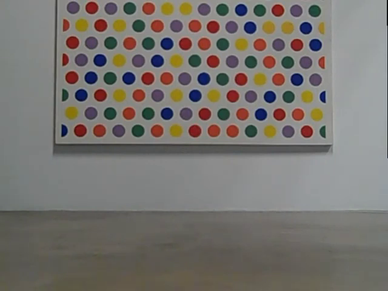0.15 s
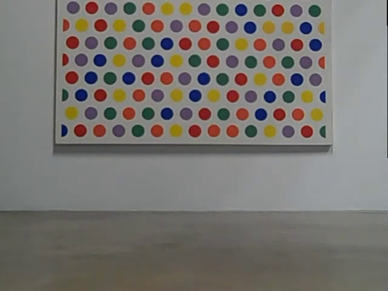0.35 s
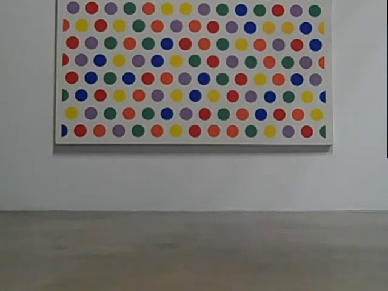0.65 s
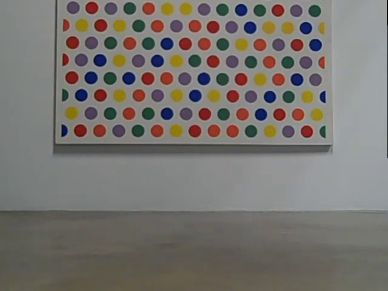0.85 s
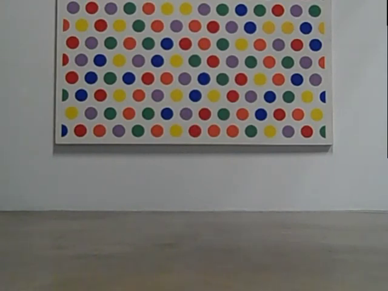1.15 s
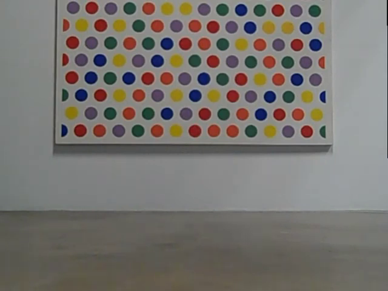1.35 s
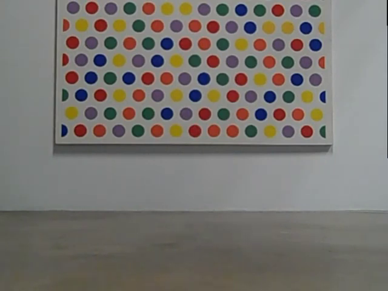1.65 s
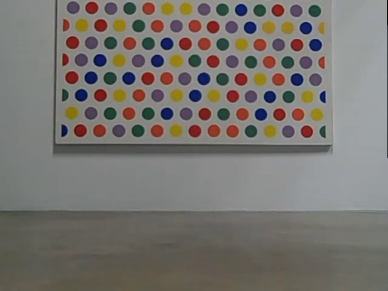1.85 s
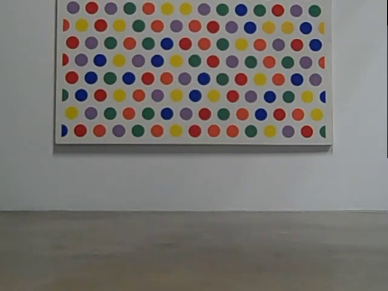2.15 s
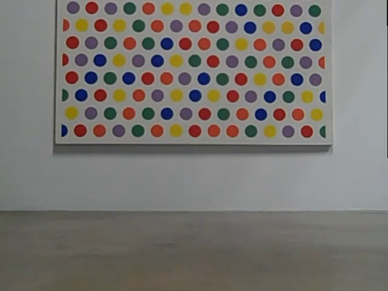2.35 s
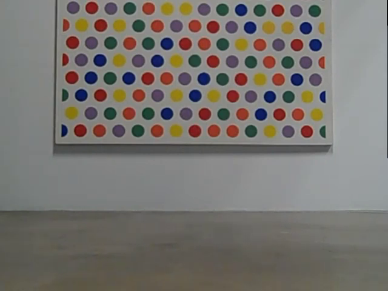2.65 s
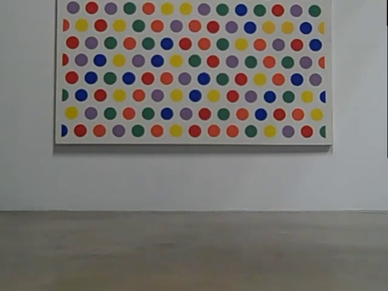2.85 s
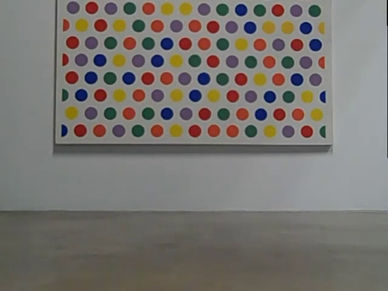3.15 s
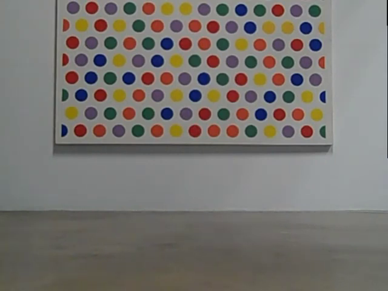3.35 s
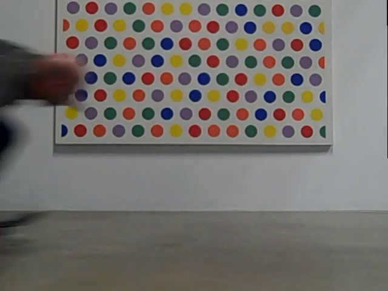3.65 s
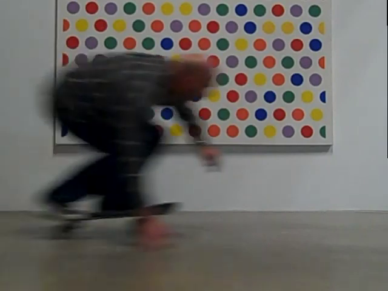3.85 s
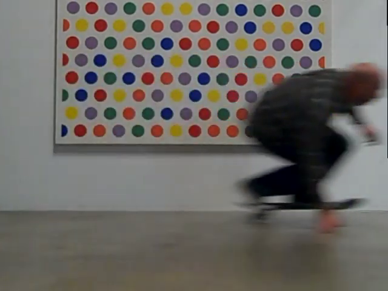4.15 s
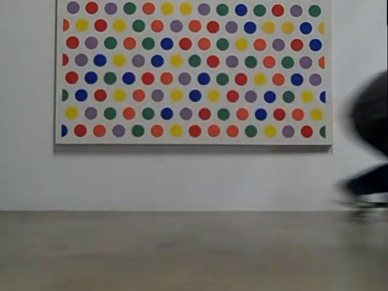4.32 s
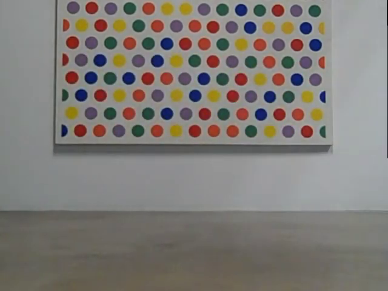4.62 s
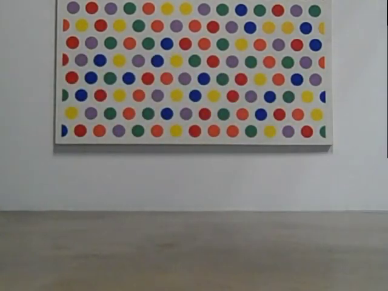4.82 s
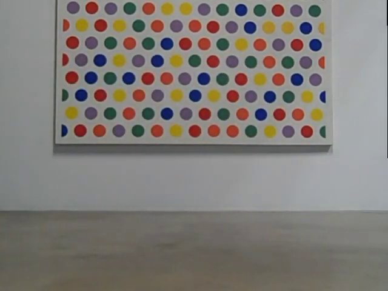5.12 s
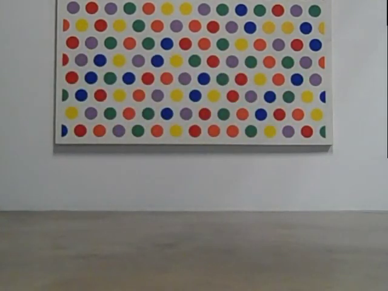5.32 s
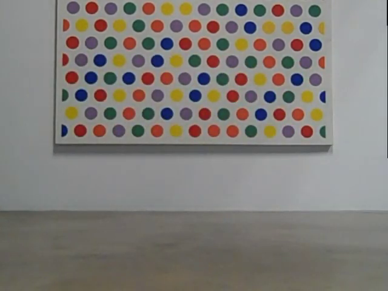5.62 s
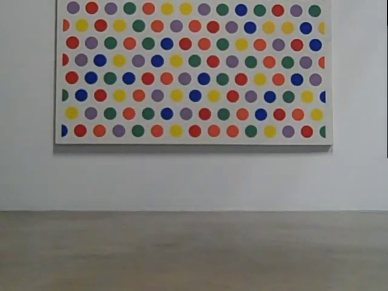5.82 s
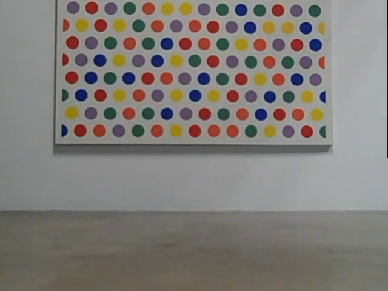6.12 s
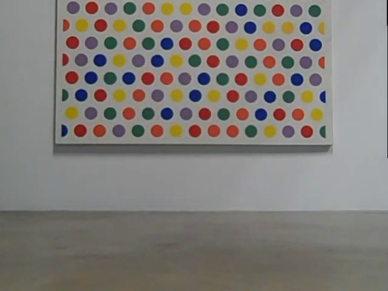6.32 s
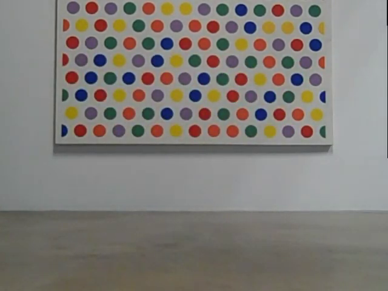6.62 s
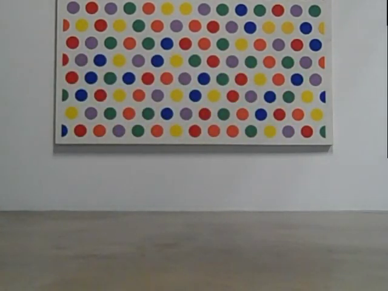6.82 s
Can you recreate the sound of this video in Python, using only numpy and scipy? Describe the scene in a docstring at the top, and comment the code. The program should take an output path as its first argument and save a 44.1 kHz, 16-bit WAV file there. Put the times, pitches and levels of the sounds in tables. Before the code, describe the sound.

In an echoing hall with a steady hush of ventilation, skateboard wheels drum across concrete and give a thin squeak. A cluster of sharp clacks and thuds follows, and the rolling grows louder. The wheels scuff, then skid close by, singing on one rough note through a slide. Two hard clacks end the slide, and the rolling fades.

```python
"""In a large, bare gallery with softly rushing ventilation, a skateboard crosses the concrete floor.
Its wheels rumble over tiny bumps and squeak; the wooden deck clatters under the rider's feet.
The wheels scrape in a skid, then stick and slip so that they sing through a glide.
The board clacks twice and rolls away, and the hall rings on after every blow."""
import sys
import numpy as np
from scipy import signal
from scipy.fft import rfft, irfft, next_fast_len
from scipy.io import wavfile

SR = 44100
rng = np.random.default_rng(int(sys.argv[2]) if len(sys.argv) > 2 else 0)


def dump(signal):
    """Clip the signal to [-1, 1] and save it as 16-bit WAV at the path in sys.argv[1]."""
    limited = np.clip(np.atleast_2d(signal).T, -1, 1)
    pcm = np.round(limited * 32767).astype(np.int16)
    wavfile.write(sys.argv[1], SR, pcm)


N = 307630
TIME = np.arange(N) / SR
FFT_SIZE = next_fast_len(N + 3 * SR)  # leaves room for the hall's echo
FREQS = np.maximum(np.arange(FFT_SIZE // 2 + 1) * SR / FFT_SIZE, 1)
GLIDE_START_S, GLIDE_END_S = 3.17, 4.66  # from the big skid to the last two clacks

# axles landing wheel by wheel, and at 2.047, 2.189 and 2.308 s the rider's footsteps and shoe scuffs: t/s,
# wood/dB, metal/dB, thud/dB, rattle/s, second blow's delay/s
CLACKS = [(1.752, -24, -42, -50, 0.048, 0.031), (2.047, -9, -24.5, -23, 0.019, .03),
          (2.189, -2.5, -22, -8.5, .035, .033), (2.308, -3, -19, -20.5, 0.031, .031),
          (3.065, -7.5, -21, -25, 0.0055, .017), (3.174, -9, -23, -27.5, 0.014, .026),
          (4.673, -13, -20, -21.5, .012, .021), (4.784, -8.5, -19.5, -20, 0.0075, .016)]
# the rider's weight comes down on the deck: t/s, thud/dB, deck ring/dB
STEPS = [(.503, -55, -30.5), (1.085, -27, -35), (2.032, -13.5, -17), (2.082, -21, -23), (2.141, -15.5, -19),
         (2.947, -35, -15), (3.135, -40, -13), (4.705, -31, -1.5), (4.81, -24, -7.5)]


def from_db(db):
    """Turn decibels into a gain."""
    return 10 ** (np.asarray(db) / 20)


def rms_one(x):
    """Scale a signal to an average power of 1."""
    return x / np.sqrt(np.mean(x ** 2) + 1e-20)


def at_hz(points, hz):
    """Read a table between its rows, with frequency spaced in octaves."""
    f, value = np.transpose(points)
    return np.interp(np.log(hz), np.log(f), value)


def since(s):
    """Seconds gone by since a moment; zero before it."""
    return np.maximum(TIME - s, 0)


def gate(start_s, end_s, attack_s, release_s):
    """A level that fades in at the start, holds, and fades out from the end on."""
    return np.clip(since(start_s) / attack_s, 0, 1) * np.clip(1 - since(end_s) / release_s, 0, 1)


def swell(peak_s, half_s, squareness=1.97):
    """A level that builds and eases in a bell shape."""
    return np.exp(-np.abs((TIME - peak_s) / half_s) ** squareness)


def drift(rate_hz):
    """A smooth random wobble of typical size 1, mostly slower than this rate."""
    hop, warm_up = 40, 2000
    r = np.exp(-2 * np.pi * hop * rate_hz / SR)
    noise = rng.standard_normal(N // hop + warm_up + 2)
    slow = signal.lfilter([1], [1, -2 * r, r * r], noise)[warm_up:]
    return np.interp(np.arange(N) / hop, np.arange(len(slow)), rms_one(slow))


def grains(per_s, spread_db, size=N):
    """Tiny contacts at random moments and of uneven strength."""
    strengths = from_db(spread_db * np.minimum(rng.exponential(1, size), 4)) * rng.choice([-1, 1], size)
    return rms_one(strengths * (rng.random(size) < per_s / SR))


def through(x, response):
    """Filter a signal with one gain for each frequency."""
    return irfft(rfft(x, FFT_SIZE) * response, FFT_SIZE)[..., :N]


def colour(x, tone):
    """Give a signal the spectrum in a table; only its shape counts, not its overall level."""
    size = 4096
    hz = np.maximum(np.arange(size // 2 + 1) * SR / size, 1)
    octaves_out = np.maximum(np.log2(tone[0][0] / hz), 0) + np.maximum(np.log2(hz / tone[-1][0]), 0)
    gain = from_db(at_hz(tone, hz) - 30 * octaves_out)
    # a minimum-phase filter: nothing sounds ahead of the hit
    cepstrum = irfft(np.log(gain + 1e-5))
    kernel = irfft(np.exp(rfft(2 * cepstrum[:size // 2], size)))
    return signal.oaconvolve(x, kernel / np.linalg.norm(kernel))[:N]


def ring(drive, hz, t60):
    """One ringing note that dies away by 60 dB in t60 seconds."""
    r, w = from_db(-60 / (t60 * SR)), 2 * np.pi * hz / SR
    gain = np.sin(w) * np.sqrt(2 * (1 - r * r))
    return signal.lfilter([0, gain], [1, -2 * r * np.cos(w), r * r], drive + 1e-18)


def diffuse(mid, side):
    """Sound from all around: left and right are alike in the bass and differ in the treble."""
    # stereo width: f/Hz, side compared with mid/dB
    width = [(30, -12), (70, -14), (250, -26.5), (600, -18), (1200, -11.5), (2000, -8.5), (3000, 0),
             (5000, -1), (8000, -3), (14000, -1.5)]
    return mid + through(side, from_db(at_hz(width, FREQS))) * np.array([[1], [-1]])


def nearby(x):
    """Direct sound reaches the two microphones slightly out of step."""
    # how far the left one is ahead: f/Hz, phase/rad
    lead = [(5500, 0.18), (7060, 1.5), (9400, -1.2), (14000, -0.66)]
    return through(x, np.exp(.5j * at_hz(lead, FREQS) * np.array([[1], [-1]])))


def texture(tone, per_s, spread_db):
    """A stereo wash of tiny contacts with this spectrum."""
    return diffuse(*[colour(grains(per_s, spread_db), tone) for _ in range(2)])


def air(level_db=-48):
    """Steady ventilation noise fills the hall."""
    # spectrum of the ventilation: f/Hz, level/dB
    tone = [(22, -16), (45, -1), (75, 4.5), (110, 4), (250, -3.5), (480, 4.5), (900, -4), (1600, -8.5),
            (2400, -16), (3100, -16.5), (4200, -23.5), (6400, -25), (8200, -33), (10500, -53), (14000, -60)]
    return from_db(level_db) * diffuse(*[colour(white, tone) for white in rng.standard_normal((2, N))])


def hall_response(build_s=0.0097):
    """The echo, as a filter: it builds up as the walls answer, and its treble dies first."""
    # how long the hall rings: f/Hz, time to fall 60 dB/s
    ring_times = [(60, 1.5), (150, 2.3), (500, 2.03), (1500, 2.4), (3300, 1.79), (4500, 1.16), (7000, 0.67),
                  (14000, 0.31)]
    t, edges = TIME[:3 * SR], np.geomspace(35, 16000, 19)
    white, tail = rng.standard_normal((2, 2, len(t))), np.zeros((2, N))
    for k, (low, high) in enumerate(zip(edges, edges[1:])):
        band = signal.sosfilt(signal.butter(2, [low, high], "band", fs=SR, output="sos"), white[k % 2])
        t60 = at_hz(ring_times, np.sqrt(low * high))
        tail[:, :len(t)] += band * np.exp(-np.log(1000) * t / t60)
    tail *= 1 - np.exp(-(TIME / build_s) ** 2)
    return rfft(diffuse(*tail) * np.sqrt(6 / SR), FFT_SIZE)


def bearings(run_db, gliding, level_db=-55.0, follows=1.17, dip_db=13, return_s=3.82, recovery_s=0.38):
    """The bearings hiss with the speed; the hiss dips after the skid and recovers."""
    # spectrum of the hiss: f/Hz, level/dB
    tone = [(1530, -29), (2600, -9), (2810, -11), (3070, -3), (3860, -6.5), (4430, -3), (4830, -7.5),
            (6070, -1), (7220, -5.5), (8100, -6), (10000, -21.5), (11600, -27), (13700, -32.5),
            (14500, -20)]
    dip = gliding * np.exp(-since(return_s) / recovery_s)
    return from_db(level_db + follows * run_db - dip_db * dip) * texture(tone, per_s=22000, spread_db=4.5)


def rumble(run_db, gliding, level_db=-43.0, follows=0.8, glide_loss_db=19, leaving_db_per_s=3.0):
    """The floor rumbles under the wheels, hardly at all in the glide, and less as the board leaves."""
    # spectrum of the rumble: f/Hz, level/dB
    tone = [(45, -34), (70, -13), (97, 0), (144, -1), (200, -0.5), (260, -3), (310, 2)]
    db = level_db + follows * run_db - glide_loss_db * gliding - leaving_db_per_s * since(GLIDE_END_S)
    return from_db(db) * texture(tone, per_s=1500, spread_db=6.0)


def growl(run_db, gliding, light_db=-35.5, heavy_db=-35.0, follows=0.9, glide_loss_db=6.5, loaded_s=1.84):
    """The deck growls, higher once the rider's weight is on it."""
    # spectra of the deck under a light and a heavy load: f/Hz, level/dB
    light_tone = [(140, -24), (240, -19), (371, -5.5), (431, -8.5), (522, -0.5), (574, -7), (620, -7.5),
                  (647, -7.5), (707, -6), (1000, -17), (1300, -53), (2200, -120)]
    heavy_tone = [(150, -44), (260, -18.5), (335, -7.5), (432, -4.5), (490, 1), (570, -1.5), (667, -0.5),
                  (734, -3), (799, -4.5), (957, -11), (1100, -15.5), (1430, -47), (2420, -120)]
    loaded = np.clip(TIME - loaded_s, 0, 1)
    light, heavy = (texture(tone, per_s=4000, spread_db=2.0) for tone in (light_tone, heavy_tone))
    deck = from_db(light_db) * np.sqrt(1 - loaded) * light + from_db(heavy_db) * np.sqrt(loaded) * heavy
    return from_db(follows * run_db - glide_loss_db * gliding) * deck


def rolling(roar_db=-42.5, throb_db=-0.5, turns_per_s=20.5, uneven_db=0.46):
    """Wheels drum over the fine roughness of the floor and throb once a turn."""
    # how hard the wheels run (push-off, burst of speed, roll away): t/s, level over an easy roll/dB
    effort = [(0.0, -12), (0.52, -12.5), (0.68, 1), (1.3, 0.5), (1.73, -2), (2.05, 9), (2.8, 7.5),
              (3.1, 10.5), (3.9, 9), (4.62, 4.5), (4.85, 4), (5.5, -1), (6.05, -1.5), (6.3, -4),
              (6.98, -3.5)]
    # spectrum of the wheels' roar: f/Hz, level/dB
    roar_tone = [(500, -33.5), (850, -6.5), (991, -2), (1080, -1), (1250, -1), (1490, -3), (1630, -1.5),
                 (2070, -12), (2290, -14.5), (2380, -18.5), (2600, -17), (3800, -33), (4200, -29.5),
                 (5460, -38), (9240, -120)]
    run_db = np.interp(TIME, *np.transpose(effort))
    gliding = gate(GLIDE_START_S, GLIDE_END_S, attack_s=0.17, release_s=0.018)
    wheel_angle = 2 * np.pi * np.cumsum(turns_per_s * (1 + 0.0606 * drift(1.32))) / SR
    throb = from_db(throb_db * np.sin(wheel_angle) + uneven_db * drift(7.4))
    roar = from_db(roar_db + run_db) * texture(roar_tone, per_s=8000, spread_db=1.0)
    return throb * (rumble(run_db, gliding) + growl(run_db, gliding) + roar) + bearings(run_db, gliding)


def drone(hz=168, t60=0.07, start_s=1.06, end_s=1.7, level_db=-39, fade_db_per_s=16.5):
    """The board hums a low note, shaken by the floor once a foot is on it."""
    bumps = grains(per_s=1500, spread_db=-1.0)
    hum = rms_one(ring(ring(bumps, hz, t60), hz, t60))
    level = from_db(level_db - fade_db_per_s * since(start_s))
    return hum * level * gate(start_s, end_s, attack_s=0.03, release_s=0.29)


def squeaks(jitter=0.0119, scoop=0.025, scoop_s=0.051, octave_db=-14, rough_db=4.0):
    """Thin rubbery squeals slide up to their pitch, swell and stop."""
    # each squeal: t/s, length/s, f/Hz, level/dB
    squeals = [(0.71, 0.245, 3272, -39.5), (1.988, 0.29, 3240, -41)]
    out, waver = np.zeros(N), 1 + jitter * drift(102)
    for s, length_s, hz, level_db in squeals:
        pitch = hz * waver * (1 - scoop * np.exp(-since(s) / scoop_s))
        phase = 2 * np.pi * np.cumsum(pitch) / SR
        arch = np.sin(np.pi * np.minimum(since(s) / length_s, 1))
        out += from_db(level_db) * arch * (np.sin(phase) + from_db(octave_db) * np.sin(2 * phase))
    return out * from_db(rough_db * drift(110))


def howl(hz=523, flat_hz=33, settle_s=0.0392, peak_s=3.27, half_s=0.058, peak_db=-16.5,
         held_db=-27.5, fade_db_per_s=8.5, jitter=0.0055, rough_db=4.5):
    """The rubbery wheels stick and slip: a note rises, flares up, then sings on through the glide."""
    # the tones in the howl: multiple of the pitch, level/dB
    partials = [(1, 2.5), (1.99, 1), (2.96, -2.5), (3.905, -16), (4.94, -16), (5.96, -21.5)]
    age = since(GLIDE_START_S)
    pitch = (hz - flat_hz * np.exp(-age / settle_s)) * (1 + jitter * drift(44.6))
    phase = 2 * np.pi * np.cumsum(pitch) / SR
    tone = sum(from_db(db + rough_db * drift(27)) * np.sin(k * phase) for k, db in partials)
    level = from_db(peak_db) * swell(peak_s, half_s) + from_db(held_db - fade_db_per_s * age)
    return rms_one(tone) * level * gate(GLIDE_START_S, GLIDE_END_S, attack_s=0.015, release_s=0.02)


def skid(judder_db=1.5, rasp_lag_s=0.016, rasp_stretch=1.23, bite_s=0.0067, bite_lead=0.98):
    """Wheels turned sideways bite, then judder over the concrete; a low rasp trails the bright grit."""
    # each scuff of the wheels: peak t/s, half length/s, rasp/dB, grit/dB
    scuffs = [(1.943, 0.052, -34, -43.5), (2.626, 0.048, -32.5, -35.5), (2.976, 0.042, -37, -42),
              (3.132, 0.039, -29.5, -36.5), (3.249, 0.086, -15.5, -17.5), (3.546, 0.044, -32.5, -39),
              (3.609, .03, -34, -37.5)]
    # spectra of the rasp and the grit: f/Hz, level/dB
    rasp_tone = [(180, -58), (300, -27.5), (417, -1.5), (467, 1.5), (517, -5.5), (610, -30), (655, -50),
                 (910, -19.5), (1040, -1), (1390, -6.5), (1570, 1.5), (1930, -7.5), (3500, -19),
                 (4550, -18), (7700, -120)]
    grit_tone = [(1410, -31), (2400, -6.5), (2790, -27), (4220, -13.5), (4940, -12.5), (5880, -1.5),
                 (7200, -4), (8120, -3), (9950, -16.5), (13700, -22), (14500, -58)]
    rasp_level, grit_level = np.zeros((2, N))
    for s, half_s, rasp_db, grit_db in scuffs:
        bite = np.clip(since(s - bite_lead * half_s) / bite_s, 0, 1)
        rasp_level += from_db(rasp_db) * bite * swell(s + rasp_lag_s, half_s * rasp_stretch)
        grit_level += from_db(grit_db) * bite * swell(s, half_s)
    rasp = from_db(-0.34) * rasp_level * texture(rasp_tone, per_s=2200, spread_db=0.0)
    close = nearby(colour(grains(per_s=14000, spread_db=2.0), grit_tone))
    scattered = texture(grit_tone, per_s=25000, spread_db=3.5)
    grit = grit_level * (from_db(-1.0) * close + from_db(-5.5) * scattered)
    return (rasp + grit) * from_db(judder_db * drift(33))


def thuds(boost_db=21):
    """Each clack and step gives a single soft push to board and floor."""
    # spectrum of a thud: f/Hz, level/dB
    tone = [(45, -27), (70, -10.5), (108, 4.5), (140, -1.5), (200, -0.5), (260, -5.5), (350, -37)]
    pushes = np.zeros(N)
    for s, db in [(s, db) for s, _, _, db, _, _ in CLACKS] + [(s, db) for s, db, _ in STEPS]:
        pushes[int(s * SR)] = from_db(db + boost_db)
    return colour(pushes, tone)


def blow(s, db, rattle_s, contact, rise_share=0.22):
    """The force of one sharp contact, followed by a rattle that swells and dies."""
    age, force = TIME[:SR // 4], np.zeros(N)
    shake = (1 - np.exp(-age / (rise_share * rattle_s))) * np.exp(-age / rattle_s)
    burst = grains(per_s=6000, spread_db=2.0, size=len(age)) * shake
    burst[0] += contact * shake.max()
    force[int(s * SR):int(s * SR) + len(age)] = from_db(db) * burst
    return force


def knocks(second_wheel_db=-3.5, wood_db=-7.0, clack_ring_db=-20.5, step_ring_db=-7.5, crack_db=-1.0):
    """Clacks knock the wood and the metal axle mounts; both clacks and steps set the deck ringing."""
    # spectra of the wood's knock and the metal's crack: f/Hz, level/dB
    wood_tone = [(250, -1), (310, -5.5), (420, 4.5), (600, -5), (740, 0.5), (950, -2.5), (1270, -4),
                 (1650, -8.5), (1950, -12.5), (2400, -17.5), (3000, -20)]
    crack_tone = [(1290, -5.5), (2200, -12), (3290, -14.5), (3670, -13.5), (5240, -14.5), (6090, -7.5),
                  (7900, -12.5), (10100, -30.5), (13700, -39), (14500, -32)]
    # notes of the plywood deck as it bends: f/Hz, level/dB, time to fall 60 dB/s
    deck_notes = [(411.7, -7, 0.083), (511, -3, 0.029), (597, -6.5, 0.055), (653, -3.5, 0.022),
                  (753, -1, 0.054), (783.5, -1.5, 0.074), (1010, -26, 0.19), (1250, -14.5, 0.065)]
    on_wood, on_metal = np.zeros((2, N))
    for s, body_db, metal_db, _, rattle_s, after_s in CLACKS:
        for at_s, wheel_db in ((s, 0), (s + after_s, second_wheel_db)):
            on_wood += blow(at_s, body_db + wheel_db, rattle_s, contact=6.3)
            on_metal += blow(at_s, metal_db + wheel_db, rattle_s, contact=1.6)
    stepping = sum(blow(s, db, rattle_s=0.0069, contact=7.6) for s, _, db in STEPS)
    on_deck = from_db(clack_ring_db) * on_wood + from_db(step_ring_db) * stepping
    wood = from_db(wood_db) * colour(on_wood, wood_tone)
    deck = sum((-1) ** k * from_db(db) * ring(on_deck, hz, t60)
               for k, (hz, db, t60) in enumerate(deck_notes))
    return wood + deck, from_db(crack_db) * colour(on_metal, crack_tone)


def scene():
    """The ventilation, the board, and the hall's echo of its blows, skids and squeals."""
    body, crack = knocks()
    thud, slide, wail, squeal = thuds(), skid(), howl(), squeaks()
    direct = nearby(thud + body + crack + wail + from_db(-0.5) * squeal)
    blows = from_db(-2.5) * thud + from_db(1.9) * body + from_db(-4.0) * crack
    friction = from_db(-7.0) * slide[0] + from_db(-4.5) * wail + from_db(3.0) * squeal
    return air() + rolling() + drone() + slide + direct + through(blows + friction, hall_response())


def record(dry, ceiling=0.88, cutoff_hz=14400):
    """The right microphone is duller than the left; peaks are rounded and the highest treble is cut."""
    # balance of the microphones: f/Hz, left minus right/dB
    tilt = [(100, 0.6), (800, 0.1), (1600, 1.5), (2800, 3.5), (4500, 2.5), (6500, -4.5), (8000, 12),
            (10000, 8), (14000, 17)]
    ratio = from_db(at_hz(tilt, FREQS))
    pair = through(dry, 2 * np.array([ratio, np.ones_like(ratio)]) / (1 + ratio))
    rounded = pair / (1 + (pair / ceiling) ** 6) ** (1 / 6)
    treble_cut = 1 / np.sqrt(1 + np.minimum(FREQS / cutoff_hz, 2) ** 200)
    return through(rounded, treble_cut)


dry = scene()
out = record(dry)
dump(out)
```